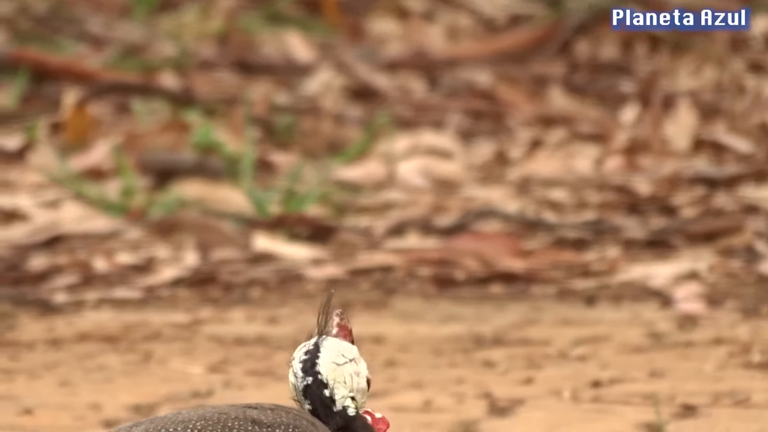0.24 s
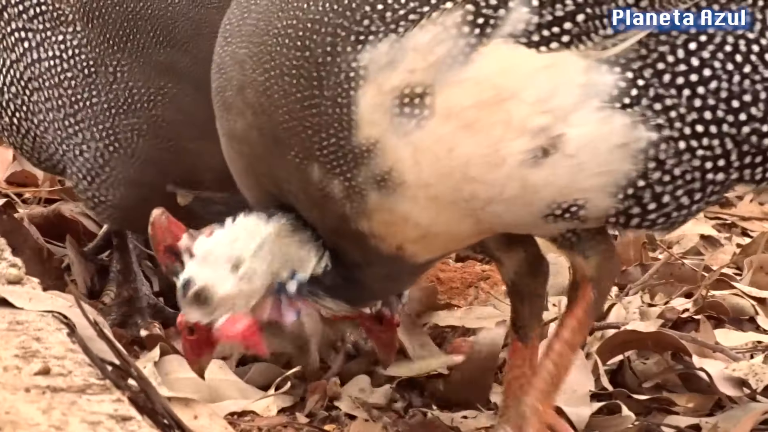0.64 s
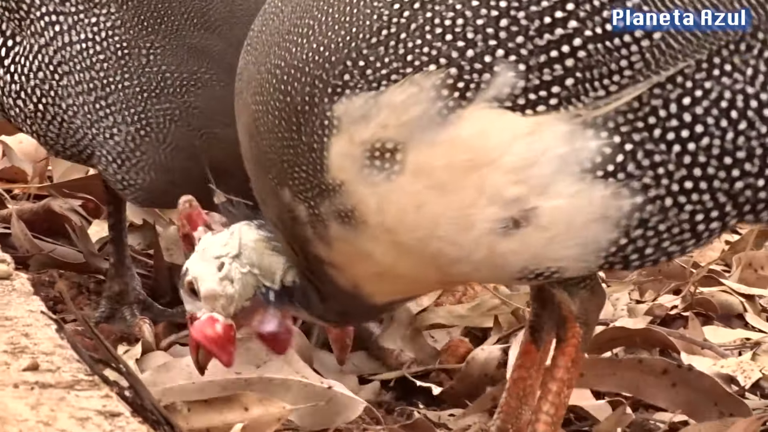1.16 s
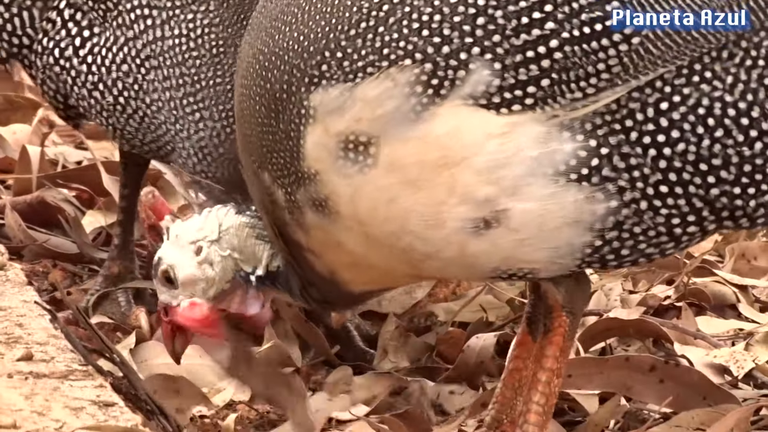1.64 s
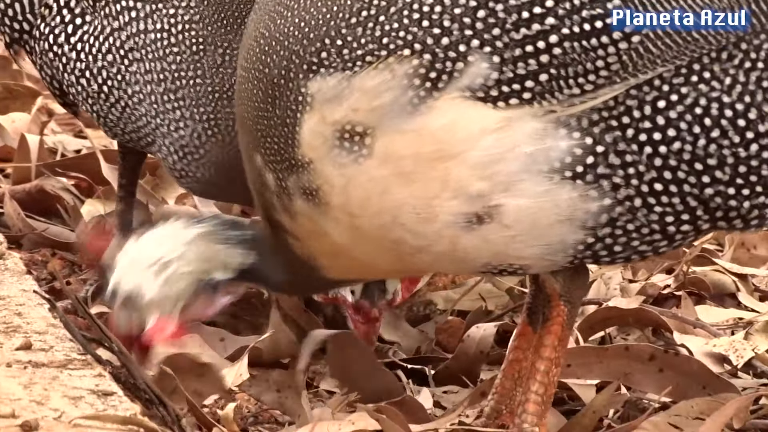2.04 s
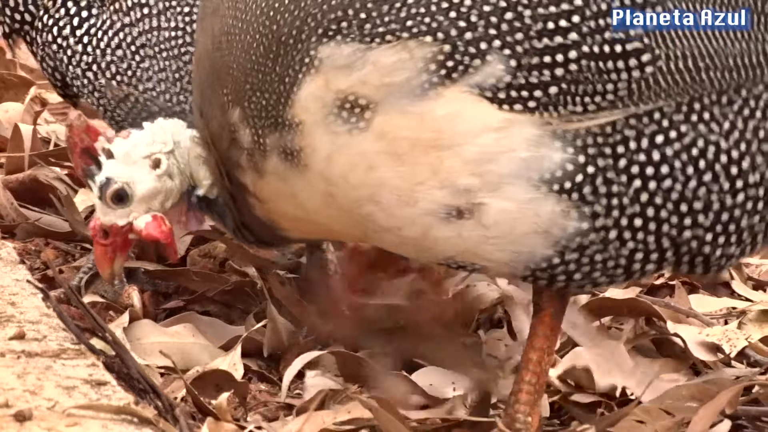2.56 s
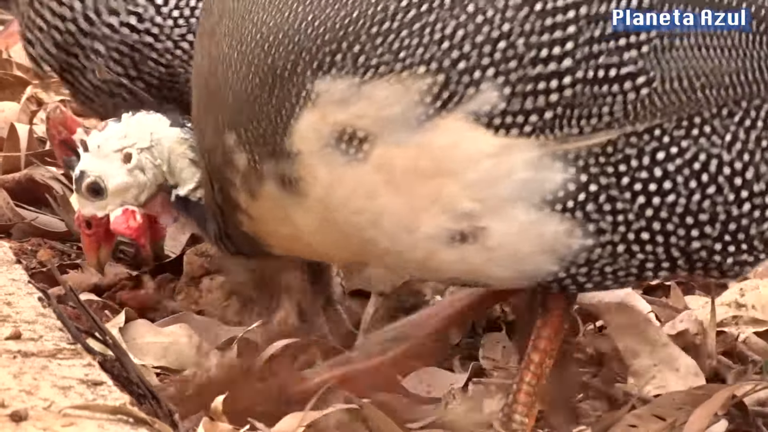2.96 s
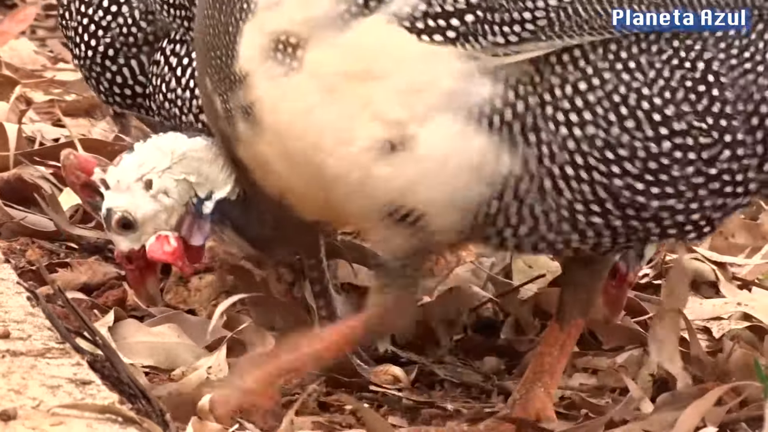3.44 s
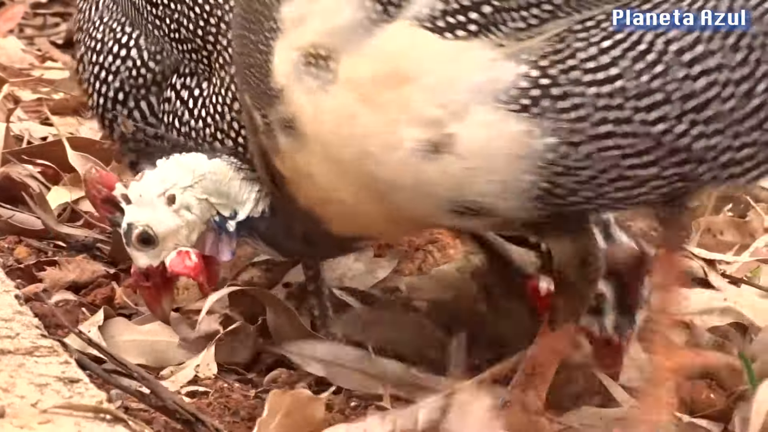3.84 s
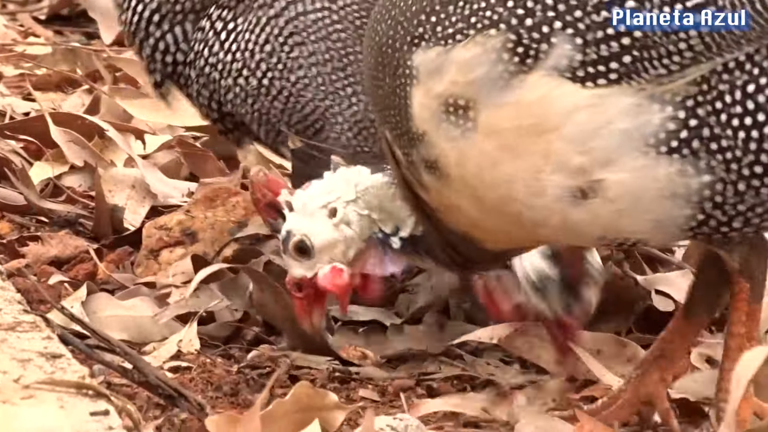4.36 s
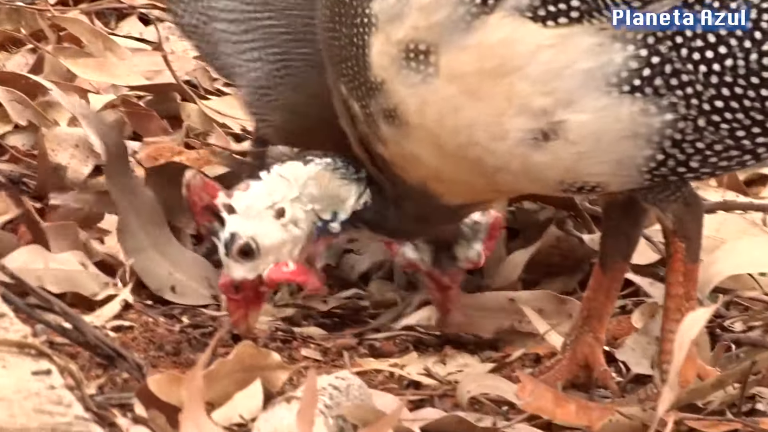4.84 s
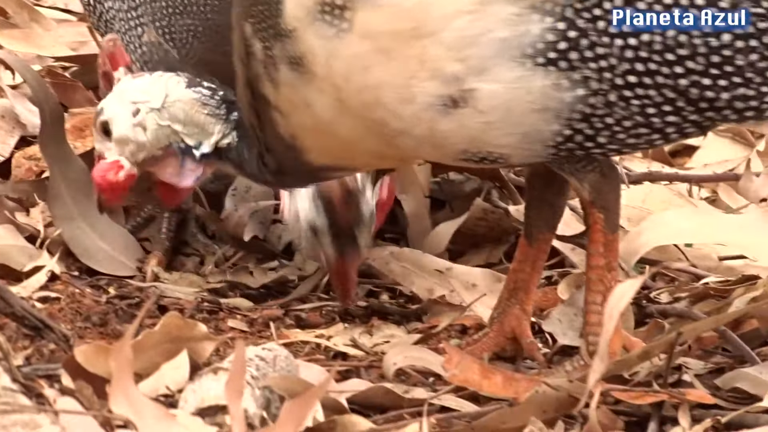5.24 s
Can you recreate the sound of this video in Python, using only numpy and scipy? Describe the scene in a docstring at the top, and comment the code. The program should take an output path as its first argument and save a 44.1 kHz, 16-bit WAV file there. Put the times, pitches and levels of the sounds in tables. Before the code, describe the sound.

A close guineafowl calls loudly and evenly for about five and a half seconds. The tail of one cry opens the sound, and more follow at about 0.6, 1.3, 2.1, 2.8, 3.5, 4.3 and 5.0 seconds. Each lasts a fifth of a second and has two syllables: a high, rasping note flips to a clear, brassy ending, or a hoarse one at the start, 2.1 and 4.3 seconds. A soft cluck comes just before each full cry. Distant birds answer faintly between calls. Dry leaves crackle quietly under shuffling feet throughout, with light scratches around 1.7, 3.1 and 3.4 seconds and small pecking snaps, mostly between 3.5 and 4.8 seconds, the sharpest near 4.6. A soft, steady outdoor hiss lies underneath. The sound is thin and bright, without bass; the cries leave a short echo among trees, and the loudest slightly overload the microphone.

```python
"""Guineafowl at the edge of a wood.

Each cry is a soft cluck, then a loud call from the vibrating membranes of the syrinx: a rough low
tone breaks through a rasp of irregular pulses and flips to a clear high tone or stays hoarse.
Other birds answer faintly and scratch in dry leaves, which crackle in tiny impulses, over a hiss of air.
The trees scatter the sound into an echo, and the loudest notes overload the microphone."""
import sys
import numpy as np
from scipy import signal
from scipy.fft import rfft, irfft, next_fast_len
from scipy.io import wavfile
from scipy.ndimage import uniform_filter1d

SR = 44100
rng = np.random.default_rng(int(sys.argv[2]) if len(sys.argv) > 2 else 0)


def waveform_to_disk(signal):
    """Save audio, clipped to [-1, 1], as 16-bit WAV at the path in sys.argv[1]."""
    frames = np.transpose(np.atleast_2d(signal))
    scaled = np.clip(frames, -1, 1) * 32767
    samples = np.round(scaled).astype(np.int16)
    wavfile.write(sys.argv[1], SR, samples)


N = 242550
TIME = np.arange(N) / SR
CRY_TIME = TIME[:SR // 4]

# The near bird's calls; flip and end count from the start: start_s, flip_s, end_s, swell_s, low_db,
# low_overtone_db, beating_db, rasp_db, ending_db, ending_overtone_db, ending_pitch_hz, ending_kind
CRIES = [(-.13, 0.098, 0.2, .04, -10, -22, -18, -21, -9.5, -6, 352, "hoarse"),
         (.612, 0.1, 0.19, 0.054, -10.5, -25, -16.5, -21, -5, -15, 991, "clear"),
         (1.336, .098, .19, 0.056, -8.5, -18, -19, -22.5, -5.5, -13, 987, "clear"),
         (2.095, .12, 0.2, 0.035, -9.5, -20, -21, -19.5, -10, 1, 338.6, "hoarse"),
         (2.828, 0.11, 0.19, .036, -10, -24, -15, -18, -3, -14, 992, "clear"),
         (3.549, 0.1113, .181, 0.063, -9, -18.5, -13.5, -17.5, -5, -13.5, 983, "clear"),
         (4.275, 0.1, 0.19, 0.062, -10, -16, -12, -19, -10, -0.5, 337.4, "hoarse"),
         (4.981, 0.081, 0.18, 0.053, -4.5, -23.5, -10, -20.5, -3.5, -14, 987.2, "clear")]
# Spectrum of dry leaves: frequency_hz, gain_db
LEAF = [(700, -21), (1200, 8), (2800, 11.5), (4500, 6), (7500, 6.5), (9000, 3.5), (11000, -6.5)]


def caller():
    """Changes of vibration regime: the near bird's syrinx goes from tone through chaos to an ending."""
    rough, clear = side_tones(), np.zeros(N)
    for (start, flip, end, swell_s, low_db, low_overtone_db, _,
         rasp_db, ending_db, overtone_db, hz, kind) in CRIES:
        add(rough, from_db(low_db) * low_tone(flip, swell_s, low_overtone_db), start)
        if kind == "clear":
            add(clear, from_db(ending_db) * clear_ending(flip, end, hz, overtone_db), start)
            # the syrinx locks onto the clear tone and its chaos dies down
            rasp_db = rasp_db - 12.5 * gate(CRY_TIME, flip + .02, end - .02, edge_s=.03)
        else:
            add(rough, from_db(ending_db) * hoarse_ending(flip, end, hz, overtone_db), start)
        add(rough, from_db(rasp_db) * rasp(flip, end), start)
    soft_clucks = clucks()
    lurch = from_db(1.2 * wander(37))
    return soft_clucks + saturate(rough * lurch, clear)


def syrinx(pitch, harmonics, jitter, shimmer, flutter_hz, overtone_db=0, above=1):
    """A vibrating membrane: a harmonic series with random frequency and amplitude modulation; rms 1."""
    size, wave = len(pitch), 0
    fluttering_hz = pitch * (1 + jitter * wander(flutter_hz, size))
    phase = 2 * np.pi * np.cumsum(fluttering_hz) / SR + rng.uniform(0, 2 * np.pi)
    for k, db in harmonics:
        # the moving throat makes each weak harmonic swell and fade on its own
        waver_db = 3 * np.clip(-db / 10, 0, 1) * wander(24, size)
        amplitude = from_db(db + waver_db + overtone_db * (k > above))
        wave = wave + amplitude * np.cos(k * phase + rng.uniform(0, 2 * np.pi))
    swing = np.exp(shimmer * 2 * np.tanh(wander(flutter_hz, size) / 2))
    return rms_one(wave * swing)


def low_tone(flip, swell_s, overtone_db):
    """Source and filter: the opening tone scoops up, and its overtones glide through throat resonances."""
    # Pitch contour: time_s, pitch_hz
    scoop = [(0, 1434), (.02, 1446), (.045, 1534), (.072, 1544), (.13, 1540)]
    # Membrane spectrum: harmonic, level_db
    harmonics = [(1, 11.5), (2, -14.5), (3, 5.5), (4, -58), (6, -10), (7, 4.5)]
    # Throat resonances: centre_hz, q, added_gain
    formants = [(2746, 8.2, 4.2), (4300, 4.8, 0.55)]
    pitch = np.interp(CRY_TIME, *np.transpose(scoop))
    voice = syrinx(pitch, harmonics, jitter=.01, shimmer=.14, flutter_hz=171,
                   overtone_db=overtone_db, above=2)
    voice *= envelope(0, flip + .002, attack_s=swell_s, attack_db=13, release_s=.024, release_db=8)
    return voice + sum(gain * resonate(voice, hz, q) for hz, q, gain in formants)


def rasp(flip, end, beat_hz=515, jitter=0.11, turbulence=0.017, rise_db_per_s=98, edge_s=0.0065):
    """Aperiodic excitation: irregular slaps and turbulence drive the throat as the beak opens."""
    # Throat response, beak nearly shut: frequency_hz, gain_db
    beak_shut = [(900, -17), (1200, -61), (1450, 9), (1750, 9), (2300, 14), (3000, 7), (3900, -77),
                 (4800, 15), (5700, -5.5), (8000, -6.5), (9200, -6.5), (10400, 4.5), (11000, -4)]
    # Throat response, beak wide open: frequency_hz, gain_db
    beak_open = [(900, -23), (1250, -7), (1750, 13.5), (2300, 3.5), (3100, -1), (4000, -3.5), (5000, -6.5),
                 (6400, -13.5), (8000, -17), (11000, -22.5)]
    size = len(CRY_TIME)
    cycles = np.cumsum(beat_hz * (1 + jitter * wander(300, size))) / SR
    slaps = np.diff(np.floor(cycles), prepend=0) * from_db(wander(190, size))
    breath = turbulence * rng.standard_normal(size) * (1 + 0.3 * np.cos(2 * np.pi * cycles))
    source = slaps + breath
    stretch = 1 + .015 * rng.uniform(-1, 1)  # the throat is set a little differently each time
    shut = rms_one(colour(source, [(hz * stretch, db) for hz, db in beak_shut]))
    wide = rms_one(colour(source, beak_open))
    opening = np.clip(0.23 + (CRY_TIME / 0.12) ** 2, 0, 1)
    voice = (1 - opening) * shut + opening * wide
    level = envelope(edge_s / 2, end, attack_s=flip, attack_db=rise_db_per_s * flip,
                     release_s=0.066, release_db=6.5, edge_s=edge_s)
    return from_db(6) * voice * level


def clear_ending(flip, end, hz, overtone_db, crescendo_db_per_s=105):
    """Nonlinear brightening: upper harmonics grow faster than the tone, so its crest turns brassy."""
    # The pitch sags and flicks up: time_from_end_s, above_lowest_percent
    sag = [(-.11, 4.1), (-.08, 2.7), (-.062, .2), (-.042, 0), (-.028, 1.2), (-.015, 5.5), (0, 8.1)]
    # Membrane spectrum: harmonic, level_db
    harmonics = [(1, -24.5), (2, 1), (3, -13), (4, -10.5), (5, 1), (6, -5.5), (7, -10), (8, -17), (9, -31),
                 (10, -22), (11, -21)]
    crest_s = end - 0.048
    effort_db = -crescendo_db_per_s * np.maximum(crest_s - CRY_TIME, 0)
    voice = syrinx(sagging(hz, end, sag), harmonics, jitter=.0055, shimmer=0.027, flutter_hz=118.5,
                   overtone_db=overtone_db + effort_db, above=3)
    level = envelope(flip - .007, end, attack_s=.016, attack_db=12, release_s=.03, release_db=17)
    return voice * from_db(effort_db) * level


def hoarse_ending(flip, end, hz, overtone_db):
    """Period tripling: only every third beat repeats, giving ragged harmonics on a third of the pitch."""
    # The pitch sags and flicks up: time_from_end_s, above_base_percent
    sag = [(-.1, 2.5), (-.07, 0.5), (-.05, 1.02), (-.027, 4), (0, 4.5)]
    # Membrane spectrum: harmonic, level_db
    harmonics = [(3, -21.5), (4, -11.5), (5, 5), (6, -8), (7, -6), (8, -8), (9, -11), (10, -13),
                 (11, -10.5), (12, -10), (13, -12), (14, -14.5), (15, -11.5), (17, -18), (19, -17.5)]
    voice = syrinx(sagging(hz, end, sag), harmonics, jitter=.013, shimmer=.22, flutter_hz=217,
                   overtone_db=overtone_db, above=6)
    return voice * envelope(flip - .014, end, attack_s=.025, attack_db=11, release_s=.026, release_db=14)


def side_tones(upper_db=-22.5, hoarse_db=-15):
    """Biphonation: the second side of the syrinx adds short tones of its own to each call."""
    # Tone beating against the low tone: delay_s, length_s, start_hz, end_hz
    beating_tone = (.018, .045, 1635, 1710)
    # Thin falling tone above it: delay_s, length_s, start_hz, end_hz
    upper_tone = (.012, .034, 2350, 2260)
    # Tone within a hoarse ending: after_flip_s, length_s, start_hz, end_hz
    hoarse_tone = (.002, .04, 2020, 2060)
    rows = []
    for start, flip, _, _, _, _, beating_db, *_, kind in CRIES:
        tones = [(start, beating_tone, beating_db), (start, upper_tone, upper_db)]
        if kind == "hoarse":
            tones.append((start + flip, hoarse_tone, hoarse_db))
        for s, (delay, length, start_hz, end_hz), db in tones:
            if s + delay + length > 0:
                rows.append((s + delay, length, start_hz, end_hz, db, 1))
    return notes(rows, [(1, 0)], jitter=0.012, shimmer=0.14, flutter_hz=200, edge_s=0.0076)


def saturate(rough, clear, max_swing=.9):
    """Saturation: membranes swing only so far, so rough peaks flatten and yield to the clear tone."""
    reach = uniform_filter1d(np.abs(signal.hilbert(rough + clear)), size=6)
    return clear + rough / (1 + (reach / max_swing) ** 8) ** (1 / 8)


def clucks(length_s=0.038, fall_hz=15):
    """Source and filter: a soft, slightly falling note before the call, coloured by the throat."""
    # Clucks: start_s, pitch_hz, level_db, roughness
    events = [(0.449, 938, -23.5, 0.22), (1.184, 938, -22.5, 0.22), (1.934, 921, -21, 0.13),
              (2.671, 933, -21, 0.2), (3.387, 952, -20, 0.13), (4.115, 953, -20, 0.65),
              (4.824, 798, -19, 0.83)]
    # Membrane spectrum: harmonic, level_db
    harmonics = [(1, -10), (2, 0.5), (3, -9.5), (4, -22), (5, -22), (6, -15.5), (9, -15.5), (10, -14.5),
                 (11, -14)]
    # Throat response: frequency_hz, gain_db
    throat = [(700, -42), (950, 2), (1500, 2.5), (2000, 1), (3500, 3), (11000, -8)]
    rows = [(s, length_s, hz + fall_hz / 2, hz - fall_hz / 2, db, rough) for s, hz, db, rough in events]
    return colour(notes(rows, harmonics, jitter=0.108, shimmer=0.59, flutter_hz=332, edge_s=.015), throat)


def far_birds(low_hz=1665, rise_hz=54, high_hz=2200, fall_hz=60.4, low_rough=.33, high_rough=.18):
    """Distant voices with an emphasis near 3.3 kHz: a far bird's two-syllable answers and stray notes of the
    flock."""
    # Answers: start_s, low_note_length_s, level_db
    answers = [(1.219, 0.05, -32), (1.963, .048, -28), (2.63, 0.058, -34.5), (3.42, .047, -30.5),
               (4.148, 0.035, -30)]
    # Flock notes: start_s, length_s, start_hz, end_hz, level_db, roughness
    strays = [(0.525, 0.095, 1717, 1820, -35, 0.31), (1.605, 0.11, 1529, 1618, -36.5, .42),
              (1.608, 0.067, 2623, 2750, -43, 0.18), (5.449, .064, 2607, 3180, -39.5, .15)]
    # Membrane spectrum: harmonic, level_db
    harmonics = [(1, 1), (2, -14), (3, -17)]
    # Colour of the distant voices: frequency_hz, gain_db
    distance = [(1200, 1.5), (3300, 13), (4200, -8), (7000, -0.5)]
    low = [(s, length, low_hz, low_hz + rise_hz, db, low_rough) for s, length, db in answers]
    high = [(s + length, .038, high_hz, high_hz - fall_hz, db - 2.5, high_rough)
            for s, length, db in answers]
    voices = notes(low + high + strays, harmonics, jitter=0.151, shimmer=0.97, flutter_hz=446, edge_s=0.017)
    return colour(voices, distance)


def snaps(decay_s=0.0031, crack_share=0.61, gain_db=-13):
    """Impact excitation: each peck is a fast-dying noise burst with the resonance of the leaf it hits."""
    # Pecks and snapping leaves: start_s, level_db, centre_hz
    pecks = [(1.799, -28, 4230), (2.737, -21, 7150), (3.489, -18.5, 7200), (3.831, -23, 6300),
             (3.941, -18.5, 8200), (3.985, -17.5, 8100), (4.019, -22.5, 8000), (4.219, -20, 6900),
             (4.641, -11, 2400), (4.653, -9.5, 1970), (4.728, -19.5, 5500), (4.748, -24, 3760)]
    out, t = np.zeros(N), TIME[:SR // 20]
    for s, db, hz in pecks:
        burst = rng.standard_normal(len(t)) * np.exp(-t / decay_s)
        snap = crack_share * burst + 2 * resonate(burst, hz, q=1.8)
        add(out, from_db(db + gain_db) * snap, s)
    return colour(out, LEAF)


def scratches(gain_db=2):
    """Band-limited impulse noise: each swipe of a foot sets off a patch of crackle."""
    # Swipes through the litter: start_s, length_s, level_db, centre_hz
    swipes = [(0.252, 0.26, -50.5, 7500), (1.588, 0.15, -35.5, 6270), (1.784, 0.027, -28.5, 3550),
              (3.093, 0.031, -26, 3940), (3.428, 0.042, -28, 4080), (4.464, 0.019, -25, 3100),
              (5.467, .04, -29, 4300)]
    grains, out = crackle(), np.zeros(N)
    for s, length, db, hz in swipes:
        band = rms_one(resonate(grains, hz, q=4.2))
        out += from_db(db + gain_db) * gate(TIME, s, s + length, edge_s=0.035) * band
    return out


def shuffling(gain_db=4):
    """Amplitude modulation: the crackle of the leaves rises and falls as feet shuffle."""
    # Strength of the shuffling: time_s, level_db
    activity = [(0.0, -34.5), (0.44, -44.5), (0.83, -34.5), (1.13, -40.5), (1.39, -43), (1.55, -43),
                (1.91, -37), (2.17, -34), (2.36, -42.5), (3.45, -44), (3.61, -38.5), (3.97, -44.5),
                (4.27, -39.5), (4.46, -36.5), (4.72, -41), (5.1, -43), (5.25, -52), (5.5, -46)]
    level_db = np.interp(TIME, *np.transpose(activity)) + gain_db
    return from_db(level_db) * spread(crackle, width=0.31)


def crackle(cracks_per_s=5000):
    """Shot noise: dry leaves give dense, tiny, random cracks whose strength comes in clumps."""
    cracks = rng.random(N) < cracks_per_s / SR
    sizes = from_db(0.5 * np.minimum(rng.exponential(1, N), 5) + 1.2 * wander(44))
    return rms_one(colour(cracks * sizes * rng.choice([-1, 1], N), LEAF))


def air(level_db=-28):
    """Stationary noise: the steady hiss of the outdoors."""
    # Spectrum of the hiss: frequency_hz, gain_db
    hiss = [(300, 9), (700, -11.5), (1050, -8.5), (1500, -3.5), (2200, -5.5), (3000, -8.5), (3700, -21.5),
            (4500, -5.5), (5800, -27.5), (8000, -19.5), (11000, -32)]
    return from_db(level_db) * spread(lambda: rms_one(colour(rng.standard_normal(N), hiss)), width=0.24)


def trees(x, t60_s=1.2, treble_t60_s=0.87, build_s=0.0061, early_db=5, early_s=0.085, gain_db=-15):
    """Reverberation: scatter from near ground and far trunks decays exponentially, the treble first."""
    # Colour of the echo: frequency_hz, gain_db
    response = [(800, 3.5), (1550, 4), (2000, -2), (2800, 7.5), (4000, 7), (5000, 7), (6000, 10),
                (7500, 6.5), (11000, 10)]
    t = TIME[:SR * 3 // 2]
    scatter = spread(lambda: rng.standard_normal(len(t)), width=0.28)
    low = signal.sosfiltfilt(signal.butter(2, 3500, fs=SR, output="sos"), scatter)
    onset = (1 - np.exp(-t / build_s)) * (1 + from_db(early_db) * np.exp(-t / early_s))
    fade = onset * from_db(-60 * t / t60_s)
    treble_fade = onset * from_db(-60 * t / treble_t60_s)
    echo = (low * fade + (scatter - low) * treble_fade) / np.sqrt(np.sum(fade ** 2))
    return from_db(gain_db) * signal.fftconvolve(colour(x, response)[None], echo, axes=1)[:, :N]


def capsules(x):
    """Phase difference: the two microphone capsules meet a wave slightly out of step."""
    # Phase between the capsules: frequency_hz, left_lead_rad
    phase = [(300, -0.48), (1000, -0.58), (2000, -.38), (4000, -0.47), (7000, -0.22), (11000, -0.82)]
    lead = np.interp(np.fft.rfftfreq(2 * N, 1 / SR), *np.transpose(phase))
    rotation = np.exp(.5j * lead * np.array([[1], [-1]]))
    return irfft(rfft(x, 2 * N) * rotation)[:, :N]


def notes(rows, harmonics, jitter, shimmer, flutter_hz, edge_s):
    """Linear glides of a syrinx; roughness, from 0 to 1, scales the depth of its random modulation."""
    out = np.zeros(N)
    for s, length, start_hz, end_hz, db, rough in rows:
        at = np.flatnonzero((TIME > s - edge_s) & (TIME < s + length + edge_s))
        pitch = np.interp(TIME[at], [s, s + length], [start_hz, end_hz])
        voice = syrinx(pitch, harmonics, jitter * rough, shimmer * np.sqrt(rough), flutter_hz)
        out[at] += from_db(db) * gate(TIME[at], s + edge_s / 3, s + length - edge_s / 3, edge_s) * voice
    return out


def sagging(hz, end, sag):
    """Frequency modulation: the pitch of an ending follows a contour in percent."""
    return hz * (1 + np.interp(CRY_TIME - end, *np.transpose(sag)) / 100)


def envelope(start, end, attack_s, attack_db, release_s, release_db, edge_s=0.0063):
    """Exponential attack, hold and exponential release within a call."""
    rise = np.clip(1 - (CRY_TIME - start) / attack_s, 0, 1)
    fall = np.clip(1 - (end - CRY_TIME) / release_s, 0, 1)
    return gate(CRY_TIME, start, end, edge_s) * from_db(-attack_db * rise - release_db * fall)


def gate(t, start, end, edge_s):
    """A window with raised-cosine edges."""
    return np.sin(np.pi / 2 * np.clip(np.minimum(t - start, end - t) / edge_s + .5, 0, 1)) ** 2


def resonate(x, hz, q):
    """A second-order resonance with gain 1 at its centre."""
    return signal.lfilter(*signal.iirpeak(hz, q, fs=SR), x)


def colour(x, spectrum):
    """Zero-phase filtering by an outline of frequency_hz, gain_db."""
    hz, db = np.transpose(spectrum)
    size = next_fast_len(x.shape[-1] + 2048)
    grid_hz = np.maximum(np.fft.rfftfreq(size, 1 / SR), 1)
    gain = from_db(np.interp(np.log(grid_hz), np.log(hz), db))
    return irfft(rfft(x, size) * gain, size)[..., :x.shape[-1]]


def wander(rate_hz, size=N):
    """Low-pass noise: a smooth random drift of rms 1."""
    sos = signal.butter(2, rate_hz, fs=SR, output="sos")
    return rms_one(signal.sosfilt(sos, rng.standard_normal(size + 8000))[8000:])


def spread(make, width):
    """Mid-side stereo: a shared signal and an opposed one make left and right."""
    return (make() + width * make() * np.array([[1], [-1]])) / np.hypot(1, width)


def add(out, x, start_s):
    """Superposition: mix a sound in at a given time."""
    at = round(start_s * SR) + np.arange(len(x))
    inside = (at >= 0) & (at < N)
    out[at[inside]] += x[inside]


def from_db(db):
    """Decibels to amplitude ratio."""
    return 10 ** (np.asarray(db) / 20)


def rms_one(x):
    """Normalisation to unit power."""
    return x / np.sqrt(np.mean(x ** 2) + 1e-20)


def scene():
    """Superposition of birds, leaves, air and echo; far voices have a larger share of reverberation."""
    near = caller() + snaps() + scratches()
    flock = far_birds()
    direct = near + flock + shuffling() + air()
    return capsules(direct + trees(near + from_db(11) * flock))


def record(dry, low_cut_hz=905, band_edge_hz=11050, ceiling=0.97, cutoff_hz=16000):
    """Band limiting and overload: the loudest peaks clip, and a low-pass trims the distortion."""
    x = signal.sosfilt(signal.butter(6, low_cut_hz, "high", fs=SR, output="sos"), dry)
    x = signal.sosfilt(signal.ellip(12, .1, 80, band_edge_hz, fs=SR, output="sos"), x)
    x = np.clip(x, -ceiling, ceiling)
    return signal.sosfilt(signal.ellip(10, .1, 70, cutoff_hz, fs=SR, output="sos"), x)


dry = scene()
out = record(dry)
waveform_to_disk(out)
```